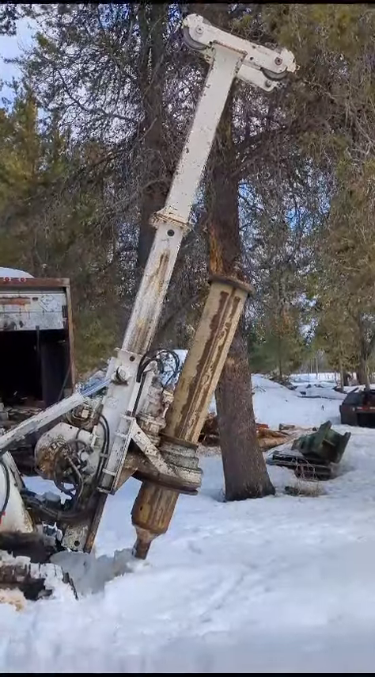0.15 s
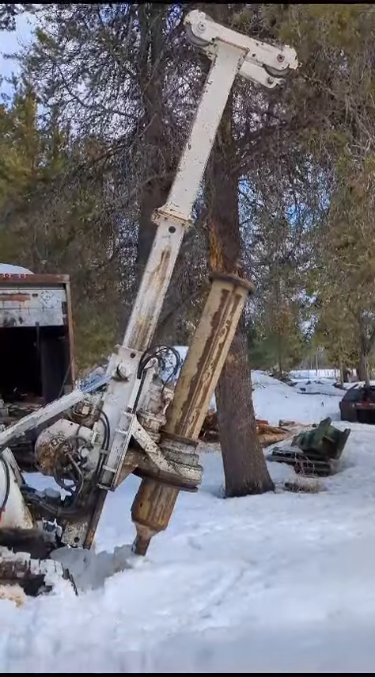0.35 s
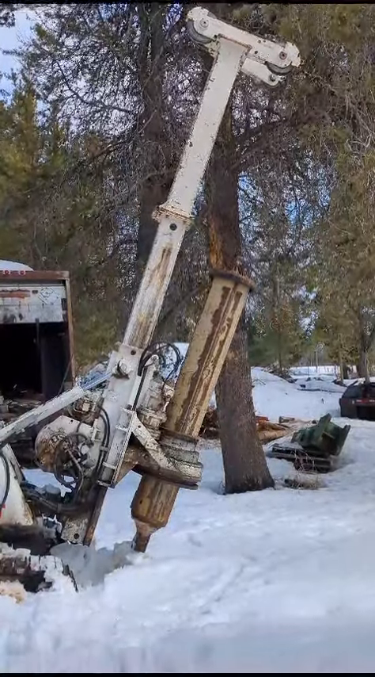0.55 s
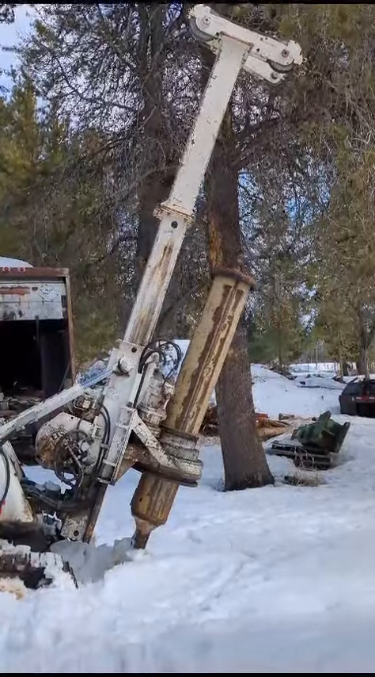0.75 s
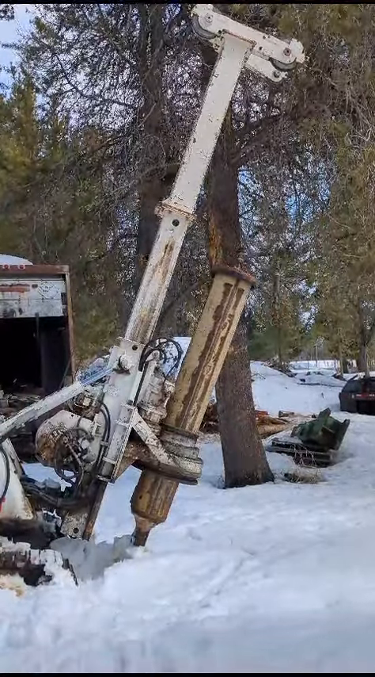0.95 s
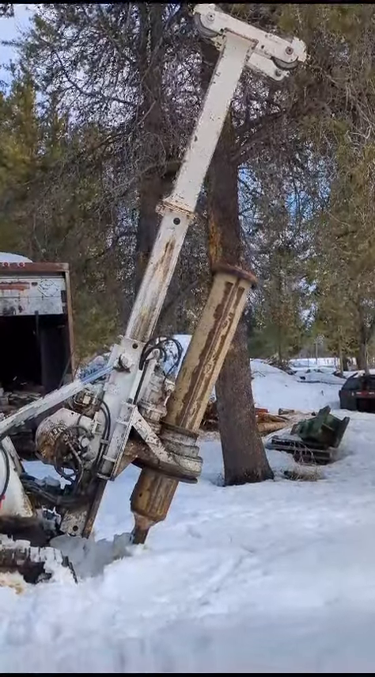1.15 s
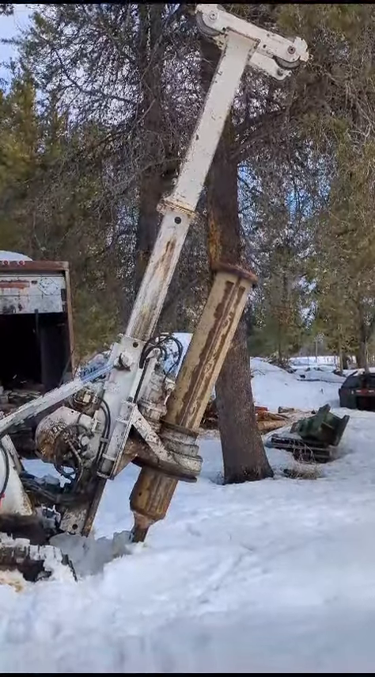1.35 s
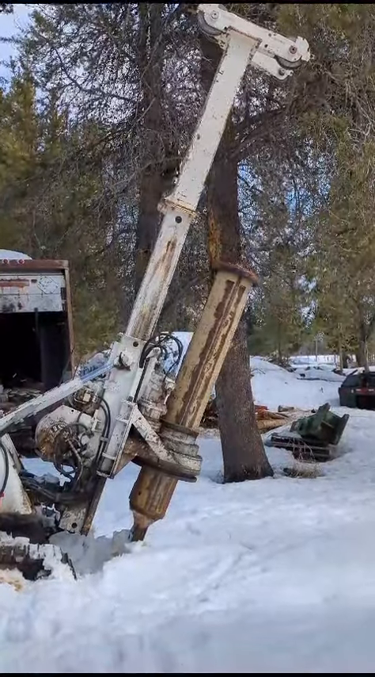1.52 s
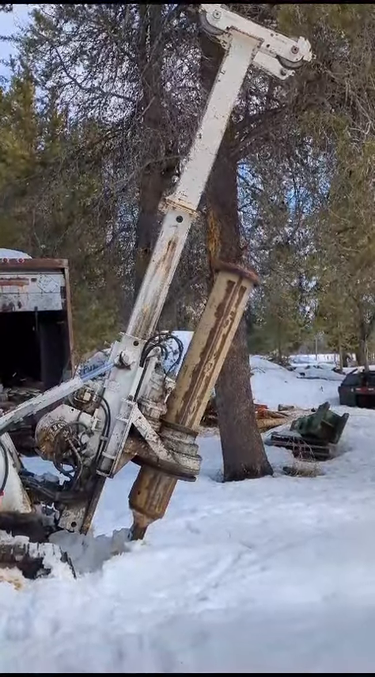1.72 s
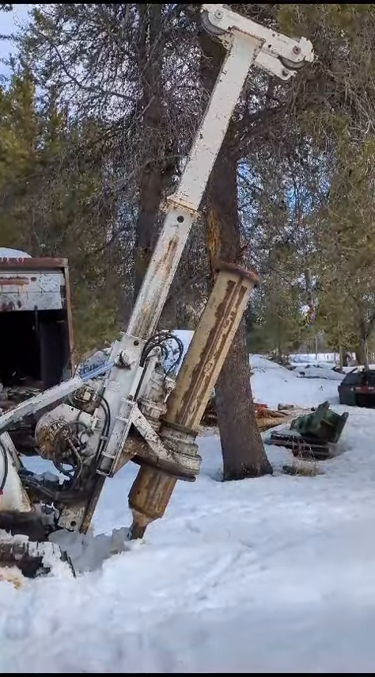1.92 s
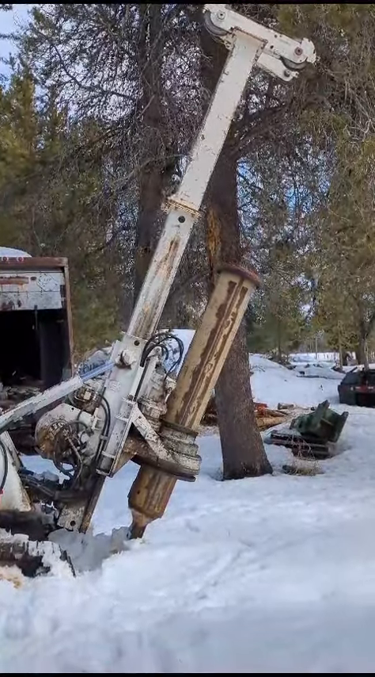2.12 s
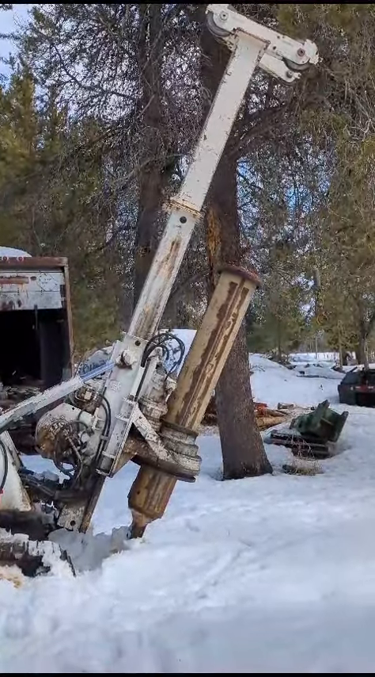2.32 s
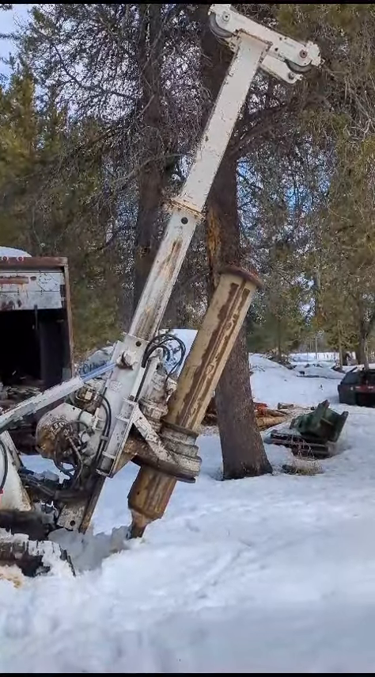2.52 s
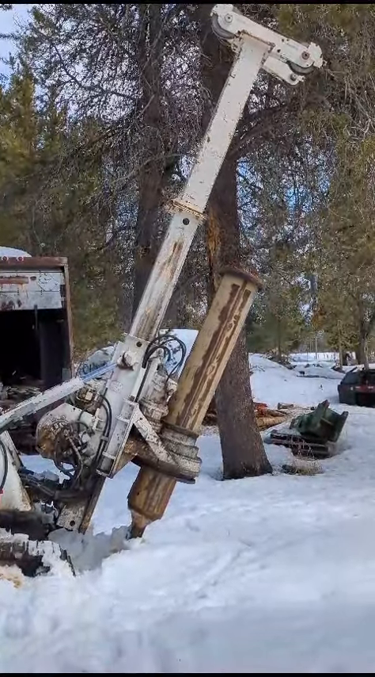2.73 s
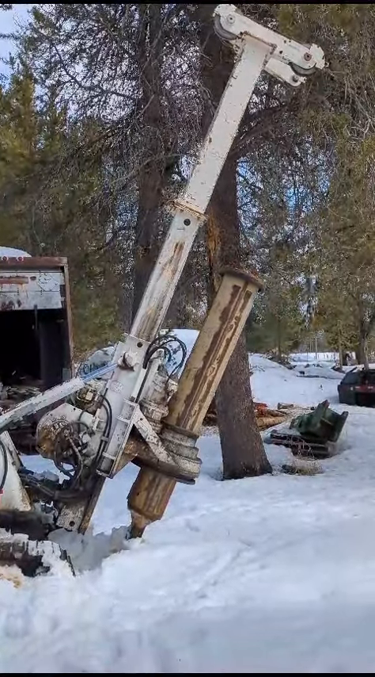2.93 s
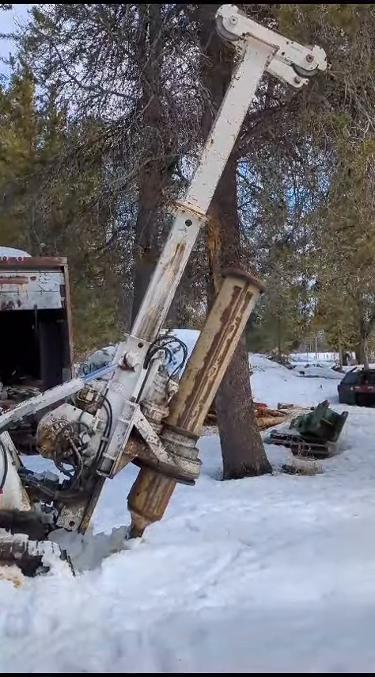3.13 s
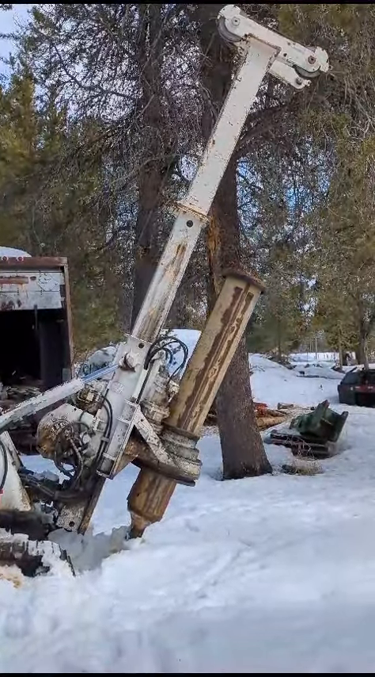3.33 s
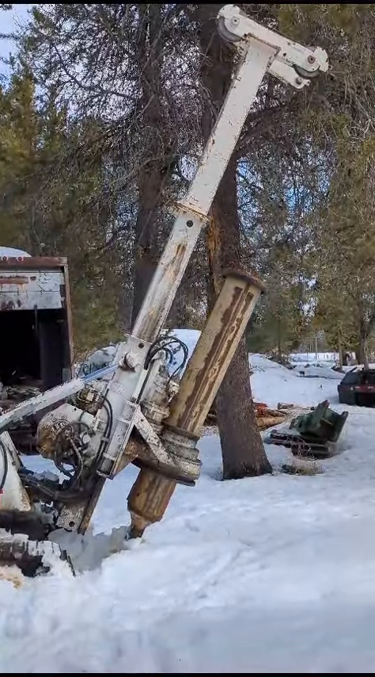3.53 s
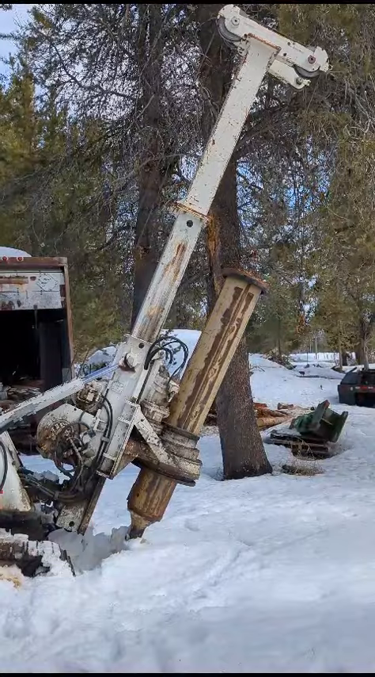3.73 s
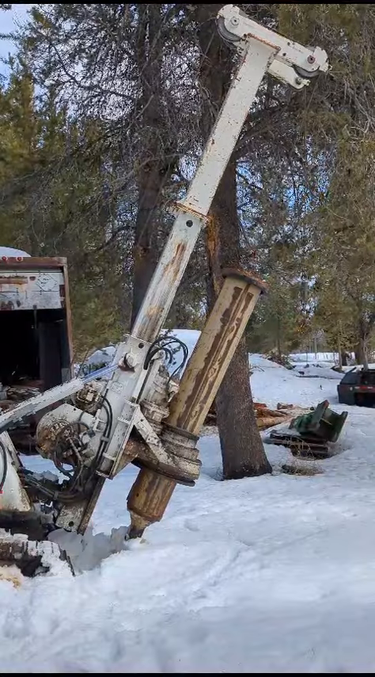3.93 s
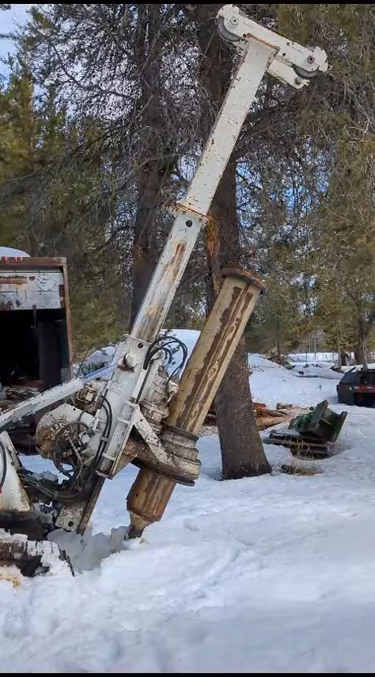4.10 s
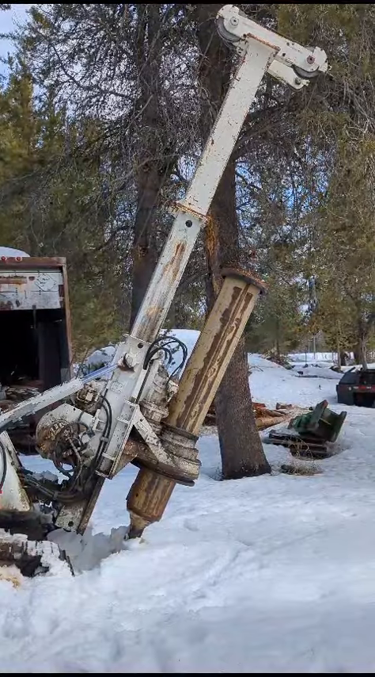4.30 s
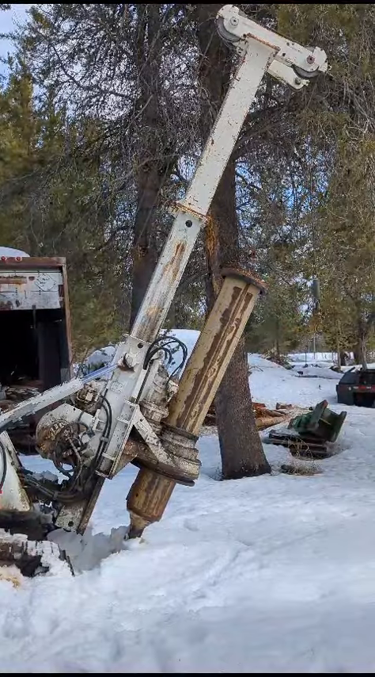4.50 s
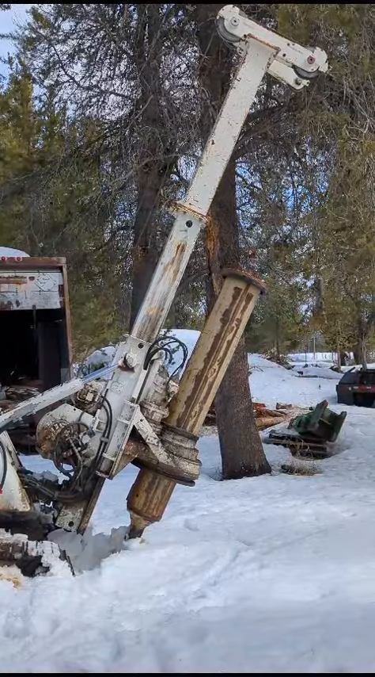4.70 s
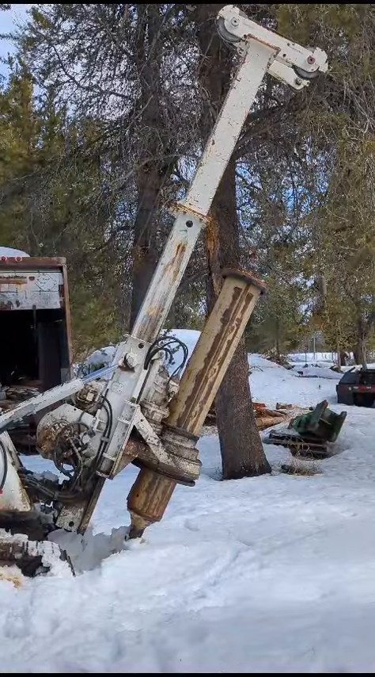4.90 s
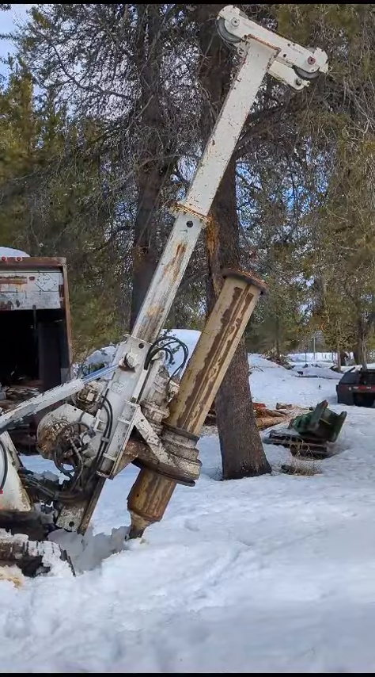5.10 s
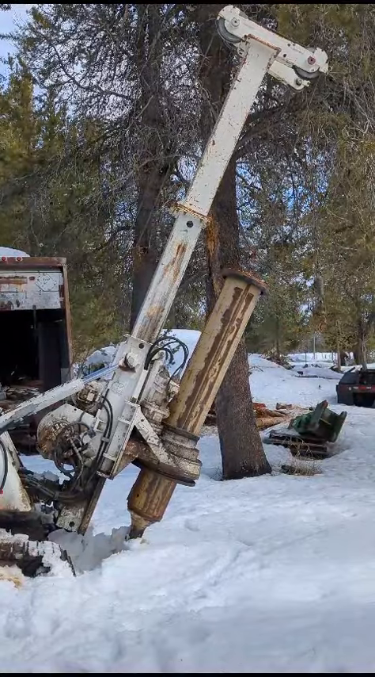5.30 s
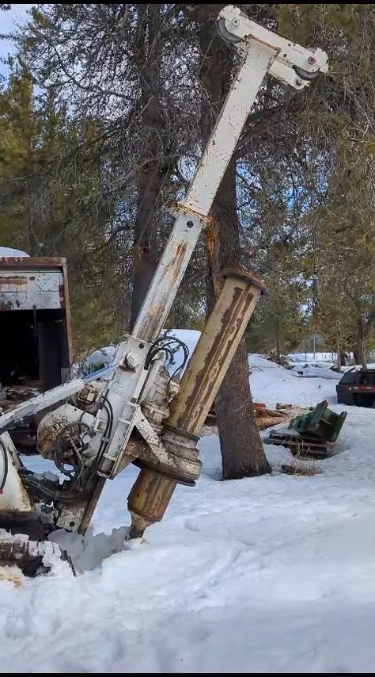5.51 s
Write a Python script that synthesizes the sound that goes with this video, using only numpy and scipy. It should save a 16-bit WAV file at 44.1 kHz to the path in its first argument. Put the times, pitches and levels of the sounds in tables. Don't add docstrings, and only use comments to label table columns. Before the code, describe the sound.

Outdoors, close to a small drill rig, a four-cylinder diesel pulls hard with a deep, fast exhaust throb and gritty blasts. Around 3.4 seconds the load releases: the engine speeds up slightly and becomes much quieter, leaving valve clatter, faint oil whistle and tiny air puffs. At 5 seconds the throttle shuts and the pitch falls. Phone stereo, stronger on the left.

```python
import sys
import numpy as np
from scipy import signal
from scipy.fft import rfft, irfft, next_fast_len
from scipy.io import wavfile
from scipy.ndimage import uniform_filter1d

SR = 44100
rng = np.random.default_rng(int(sys.argv[2]) if len(sys.argv) > 2 else 0)


def master(y):
    cut = np.clip(np.atleast_2d(y).T, -1, 1)
    pcm = np.round(cut * 32767)
    wavfile.write(sys.argv[1], SR, pcm.astype(np.int16))


def boost_factor(decibels):
    exponent = np.asarray(decibels, float) / 20
    return 10 ** exponent


N = 244755

# (time [s], firing rate [Hz])
ENGINE_SPEED = [(0, 65.71), (3.33, 65.75), (3.41, 68.94), (3.52, 71.2), (3.68, 71.6), (4.99, 71.52),
                (5.07, 69.24), (5.15, 67.85), (5.25, 64.42), (5.4, 60.4), (5.47, 57.7), (5.55, 57.7)]
TONE_ORDERS = [.5, 1.5, 2.5, 3, 3.5, 4, 5, 6, 7, 8, 8.5, 9.5, 11, 11.5, 11.75, 12, 12.25, 15, 19, 22, 25,
               26, 27, 28, 30, 32, 34.5, 35.5, 40.5]
# (under load [dB], running free [dB])
TONE_LEVELS = [(-36.5, -58), (-47.5, -44.5), (-54, -46), (-35.5, -38.5), (-40, -46), (-35.5, -53),
               (-34, -71), (-60, -41.5), (-34.5, -79), (-47, -78), (-63, -41), (-38.5, -81), (-66, -82),
               (-53, -56), (-70, -50.5), (-56, -45.5), (-70, -56), (-65.0, -53.5), (-78, -52), (-45, -56),
               (-53, -63), (-57, -55), (-49, -79), (-52, -51), (-61, -65), (-66, -59.0), (-70, -54.5),
               (-70, -53.5), (-70, -53)]
CYLINDER_LEVELS = [-0.75, 0.082, 0.26, 0.5]
# (frequency [Hz], level per Hz [dB])
BLAST_COLOUR = [(25, -11), (45, -24), (80, -0.5), (200, -15), (450, 2.5), (550, -11.5), (750, 1.5),
                (950, -9.5), (1500, -5), (2500, -12), (4000, -13.5), (6000, -21.5), (11500, -26),
                (15500, -39)]
# (frequency [Hz], width [Hz], lift [dB])
CASING_RINGS = [(2240, 650, 3.5), (3540, 210, 4), (4476, 150, 8), (4890, 430, 8), (6570, 280, 4),
                (7340, 410, 5), (8540, 430, 5.5), (9410, 450, 9.5), (10400, 660, 8), (11700, 650, 3.5)]
# (low [Hz], high [Hz], wander [dB], changes [per s])
BLAST_WANDER = [(730, 2100, 1, 9), (1690, 2200, 4, 9.07), (4300, 4650, -1, 6.35), (4800, 5240, 5.5, 3.8),
                (8500, 10200, 3, 8.4)]
# (frequency [Hz], level per Hz [dB])
CLATTER_COLOUR = [(25, -9), (45, -4), (80, -5.5), (200, -2), (450, -3), (550, -11.5), (750, -6.5),
                  (950, -12), (1500, -14), (2500, -16), (4000, -21.5), (6000, -30), (11500, -44),
                  (15500, -76)]
# (frequency [Hz], width [Hz], lift [dB])
COVER_RINGS = [(620, 41, 3), (1580, 300, 0.5), (2720, 1400, 2.5), (3495, 93, 7), (3850, 150, 1),
               (4380, 380, 1), (5370, 500, -4), (5731, 150, 6), (6600, 400, 2.5), (7120, 500, 6),
               (8750, 400, -3), (9360, 400, 9.5)]
# (time [s], length [s], level [dB])
AIR_SPURTS = [
    (2.76, 0.065, -45),
    (3.309, .05, -46),
    (3.57, 0.056, -58),
    (3.939, 0.028, -63.5),
    (4.17, .02, -65),
    (4.9, .02, -69),
]
# (frequency [Hz], level [dB], phase [rad], likeness [0-1])
RIGHT_PORT = [(53, -0.27, -0.09, 0.99), (255, 1.54, 1.05, 0.94), (526, 6, .5, 0.84), (746, -2.5, 3, 0.77),
              (1420, -5.5, 2.5, 0.62), (2190, -9.5, -0.56, 1), (2830, -7, 0.7, 0.9), (4260, -5, 3, 0.9),
              (5040, -17.5, -1.5, .7), (6770, -7.5, -7, 0.54), (9320, -15.5, 0.5, 0.4),
              (11450, -13, -9.5, .6), (12500, -2, -12, .2), (14000, -28, -15, 0.2)]
# (frequency [Hz], width [Hz], depth [dB])
RIGHT_NOTCHES = [(630, 69, -32), (1930, 180, -7.5), (3720, 450, -15)]
# (frequency [Hz], level [dB])
OIL_COLOUR = [(6000, -18), (8800, -11), (9050, -4), (9600, -9), (10700, -12), (11100, -19), (15000, -22)]
AIR_COLOUR = [(5000, -38), (9000, -3), (12000, 0.5), (15500, -8)]
HUM_COLOUR = [(400, -46), (590, -13), (635, 7.0), (680, -11), (900, -47)]

PORT_LAG_S = 0.0004904
FREE_DB, LOADED_DB = -37, -28
HUNT_HZ, HUNT_PER_S = .12, 5.5
UNLOAD_S, SETTLE_S, COLLAPSE_S = 3.39, .065, 0.086
SURGE_S, SURGE_WIDTH_S, SURGE_DB, BARK_DB = 3.345, .035, 1.5, 4.5
# (under load [dB], running free [dB], lost per Hz of speed once the throttle is shut [dB])
THUMP, SECOND, RACKET = (-14, -24, .35), (-30, -29, 1.2), (-28, -37.5, 0.18)
SHUT_S, SHUT_TAKES_S, SECOND_DROP_DB, RACKET_DROP_DB = 5.0, 0.074, -17, -1
KICK_S, KICK_WIDTH_S, KICK_DB = 5.095, 0.033, 3
VALVE_DB, VALVE_EASES_S, VALVE_EASE_TAKES_S, VALVE_EASE_DB, VALVE_DB_PER_HZ = -53.5, 4.4, .07, -6, 1.1
RUNDOWN_DB, RUNDOWN_DB_PER_ORDER = -35.5, 4.5
TREBLE_DB_PER_HZ = 0.13


def blast(cycle, load, racket_db):
    swell = puff(cycle, start=0.45, rise=.2, rest=0.13)
    grit = boost_factor(firing_db(cycle, scatter_db=0.68) + 1.86 * np.clip(walk(1500), -2, 2))
    drive = with_repeats(noises(grit * swell), swell, 4 * cycle, share=0.18, top_hz=2240)
    rung = ring(drive, response(BLAST_COLOUR, CASING_RINGS))
    wander = 0
    for low_hz, high_hz, wander_db, rate in BLAST_WANDER:
        gain = boost_factor(wander_db * np.clip(walk(rate), -1, 1))
        wander = wander + band_pass(rung, low_hz, high_hz) * (gain - 1)
    return (rung + wander) * np.sqrt(load) * boost_factor(racket_db - 0.63)


def exhaust_tones(cycle, load, first_db, second_db, closed):
    angle = 2 * np.pi * cycle
    slip = 2.4 - 1.7 * load - 2.0 * closed
    out = boost_factor(first_db + 0.24 * walk(13)) * np.cos(angle)
    out += boost_factor(second_db + 0.19 * walk(15)) * np.cos(2 * angle + slip)
    for order, (loaded_db, free_db) in zip(TONE_ORDERS, TONE_LEVELS):
        fade_db = np.clip(3 * (3.8 - order), -18, -2)
        if order in (3, 5):
            fade_db = RUNDOWN_DB - RUNDOWN_DB_PER_ORDER * (order - 3) - free_db
        level_db = free_db + (loaded_db - free_db) * load + fade_db * closed + 1.0 * walk(14)
        shaken = angle + 0.0065 * walk(20)
        out += boost_factor(level_db) * np.cos(order * shaken + (order - 1) * slip)
    return np.sqrt(2) * out


def clatter(cycle, load, racket_db, closed):
    swell = puff(cycle, start=.22, rise=.15, rest=1.2)
    grit = boost_factor(firing_db(cycle, scatter_db=-0.15) + 1.0 * walk(900) + .7 * walk(8.1))
    drive = with_repeats(noises(grit * swell), swell ** 1.5, cycle, share=.75 - .5 * closed, top_hz=3400)
    level_db = np.minimum(racket_db, FREE_DB) + 1.27 * load
    return ring(drive, response(CLATTER_COLOUR, COVER_RINGS)) * boost_factor(level_db)


def valve_hiss(load, racket_db, hiss_db):
    power = np.maximum(boost_factor(2 * hiss_db) - boost_factor(2 * (racket_db - 23.5)), 0) * (1 - load)
    drive = noises(boost_factor(2.0 * walk(70) + 2.0 * walk(600)))
    return ring(drive, response(OIL_COLOUR, [(9540, 150, 6.6)], lo=8314, hi=11000)) * np.sqrt(power)


def air_spurts(t, cycle, load):
    shape = sum(boost_factor(db) * hump(t, start, length) for start, length, db in AIR_SPURTS)
    chopped = 1 + 2.56 * load * puff(cycle, start=0.41, rise=.18, rest=0)
    drive = noises(chopped * boost_factor(3.0 * np.clip(walk(900), -2, 2)))
    return ring(drive, response(AIR_COLOUR, [(11811, 700, 2)], lo=11466, hi=15500)) * shape


def cover_hum(closed):
    drive = noises(boost_factor(2.2 * walk(25)))
    return ring(drive, response(HUM_COLOUR, [(640.4, 41, 3.03)], lo=500, hi=800)) * closed * boost_factor(-39.5)


def ports(clean, rough):
    size = next_fast_len(N + 4096)
    hz = np.arange(size // 2 + 1) * SR / size
    points, *columns = np.transpose(RIGHT_PORT)
    db, phase, alike = (on_log(hz, points, column) for column in columns)
    notch_db = bumps(hz, RIGHT_NOTCHES)
    alike = np.clip(alike * boost_factor(-notch_db ** 2 / 40), 0, 1)
    shared = rfft(clean, size) + alike * rfft(rough[0], size)
    heard = shared + np.sqrt(1 - alike ** 2) * rfft(rough[1], size)
    turn = np.exp(1j * (phase - 2 * np.pi * hz * PORT_LAG_S))
    right = irfft(heard * boost_factor(db + notch_db) * turn, size)[:N]
    return np.array([clean + rough[0], right])


def puff(cycle, start, rise, rest):
    u = (cycle - start) % 1 / rise
    return rest + (u * np.exp(1 - u)) ** 2


def firing_db(cycle, scatter_db):
    firing = np.floor(cycle - .5).astype(int) + 2
    chance_db = scatter_db * rng.standard_normal(firing.max() + 1)
    return np.array(CYLINDER_LEVELS)[firing % 4] + chance_db[firing]


def with_repeats(noise, shape, cycle, share, top_hz):
    size = 2466
    heavy_db = 1.5 * np.cos(2 * np.pi * np.arange(size) / size)
    knocks = boost_factor(4 * walk(500)[:size] + heavy_db)
    lines = rfft(knocks * rng.standard_normal((2, size)))
    turn = irfft(lines / np.sqrt(uniform_filter1d(abs(lines) ** 2, size=9) / size), size)
    same = unit(shape) * turn[:, (cycle / 4 % 1 * size).astype(int)]
    share = np.clip(share, 0, 1)
    swap = np.sqrt(share) * same - (1 - np.sqrt(1 - share)) * noise
    return noise + band_pass(swap, 390, top_hz)


def noises(shape):
    return unit(shape) * rng.standard_normal((2, N))


def unit(shape):
    return shape / np.sqrt(uniform_filter1d(shape ** 2, SR // 10))


def ring(drive, body):
    return signal.fftconvolve(drive, body[None], axes=1)[:, :N]


def response(colour, modes, lo=1200, hi=6000):
    hz = np.arange(2049) * SR / 4096
    db = on_log(hz, *np.transpose(colour)) + bumps(hz, modes)
    db = db - 10 * np.log10(np.mean(boost_factor(db) ** 2 * (hz > lo) * (hz < hi)))
    cepstrum = irfft(db * np.log(10) / 20)
    cepstrum[1:2048] *= 2
    cepstrum[2049:] = 0
    return irfft(np.exp(rfft(cepstrum)))


def bumps(hz, modes):
    return sum(lift_db / (1 + (2 * (hz - f) / width) ** 2) for f, width, lift_db in modes)


def on_log(hz, points, values):
    return np.interp(np.log(hz + 1), np.log(points), values)


def band_pass(x, lo_hz, hi_hz):
    return signal.sosfiltfilt(signal.butter(2, [lo_hz, hi_hz], "band", fs=SR, output="sos"), x)


def walk(rate):
    hold = max(int(SR / rate), 1)
    steps = np.repeat(rng.standard_normal(N // hold + 1), hold)
    return 0.88 * uniform_filter1d(uniform_filter1d(steps, hold), hold)[:N]


def ramp(t, start, length):
    return np.clip((t - start) / length, 0, 1)


def hump(t, centre, width):
    return np.exp(-((t - centre) / width) ** 2)


def layer_db(levels, held, lost_hz):
    loaded_db, free_db, db_per_hz = levels
    return free_db + (loaded_db - free_db) * held - db_per_hz * lost_hz


def scene():
    t = np.arange(N) / SR
    hz = np.interp(t, *np.transpose(ENGINE_SPEED))
    lost_hz = (hz.max() - hz) * (t > SHUT_S - SHUT_TAKES_S)
    cycle = np.cumsum(hz + HUNT_HZ * walk(HUNT_PER_S)) / SR - .30

    kick_db = KICK_DB * hump(t, KICK_S, KICK_WIDTH_S)
    settling = np.exp(-np.maximum(t - UNLOAD_S, 0) / SETTLE_S)
    collapsing = np.cos(np.pi / 2 * ramp(t, UNLOAD_S, COLLAPSE_S))
    first_db = layer_db(THUMP, collapsing, lost_hz) + kick_db
    second_db = layer_db(SECOND, collapsing, lost_hz) + BARK_DB * hump(t, UNLOAD_S, SURGE_WIDTH_S)
    second_db += SECOND_DROP_DB * ramp(t, SHUT_S + .02, SHUT_TAKES_S)
    racket_db = layer_db(RACKET, settling, lost_hz) + SURGE_DB * hump(t, SURGE_S, SURGE_WIDTH_S)
    racket_db += 0.54 * kick_db + RACKET_DROP_DB * ramp(t, SHUT_S, SHUT_TAKES_S / 2)
    hiss_db = VALVE_DB + VALVE_EASE_DB * ramp(t, VALVE_EASES_S, VALVE_EASE_TAKES_S)
    hiss_db -= VALVE_DB_PER_HZ * lost_hz

    load = np.clip((racket_db - FREE_DB - 1) / (LOADED_DB - FREE_DB - 0.5), 0, 1)
    closed = np.clip((70.4 - hz) / 4, 0, 1) * (load < .02)
    rough = blast(cycle, load, racket_db) + clatter(cycle, load, racket_db, closed)
    rough += band_pass(rough, 3200, 15000) * (boost_factor(-TREBLE_DB_PER_HZ * lost_hz) - 1)
    rough += valve_hiss(load, racket_db, hiss_db) + air_spurts(t, cycle, load) + cover_hum(closed)
    return ports(exhaust_tones(cycle, load, first_db, second_db, closed), rough)


def top_cut(x):
    return signal.sosfilt(signal.butter(12, 15710, fs=SR, output="sos"), x)


def record(dry):
    hiss = boost_factor([[-77], [-88]]) * rng.standard_normal(dry.shape)
    mix = np.tanh(1.115 * (dry + hiss)) / 1.068
    return top_cut(mix)


dry = scene()
out = record(dry)
master(out)
```